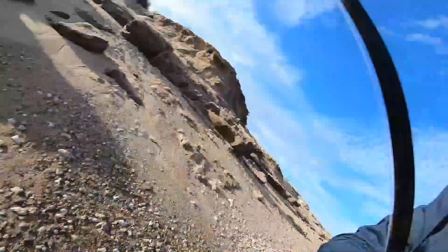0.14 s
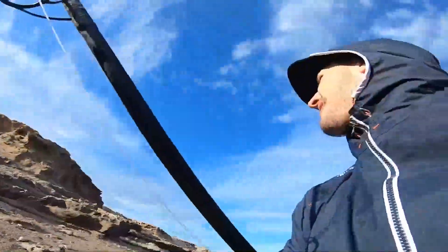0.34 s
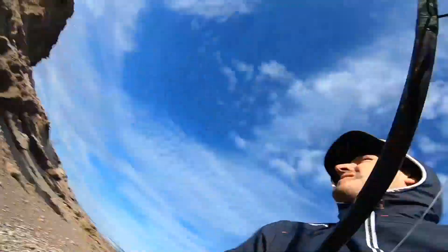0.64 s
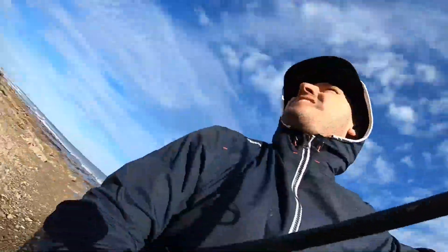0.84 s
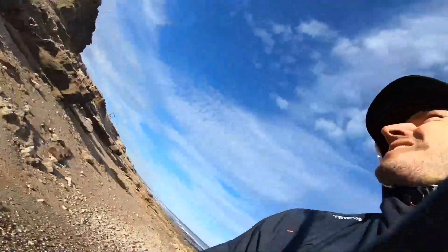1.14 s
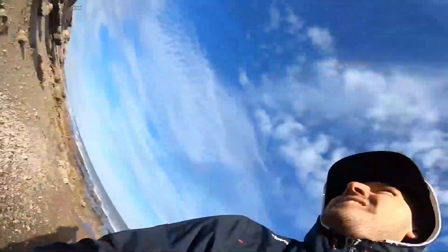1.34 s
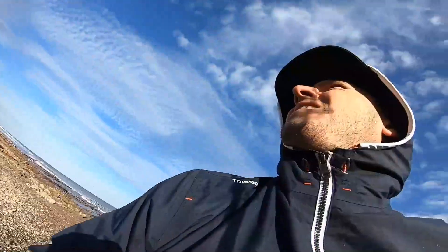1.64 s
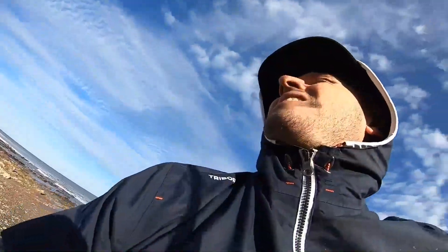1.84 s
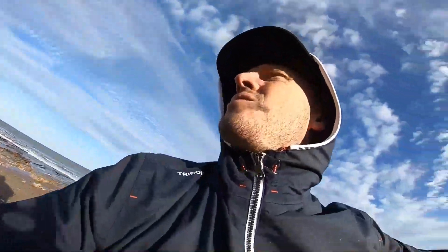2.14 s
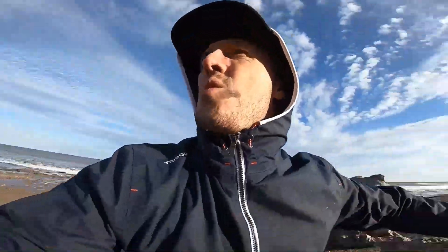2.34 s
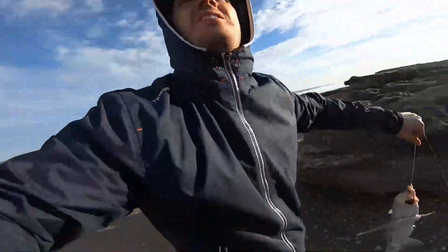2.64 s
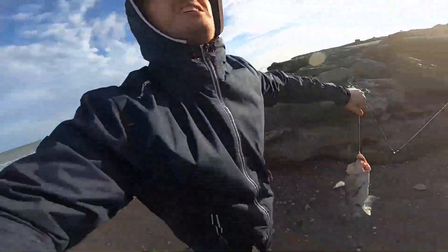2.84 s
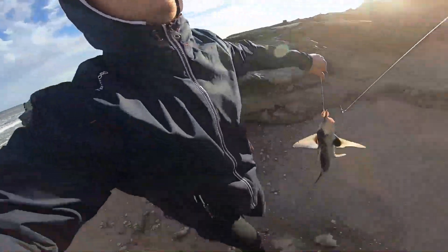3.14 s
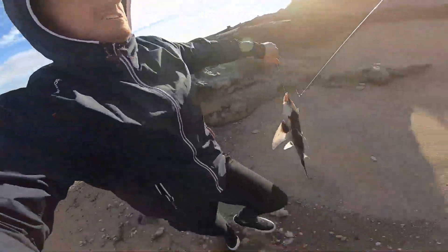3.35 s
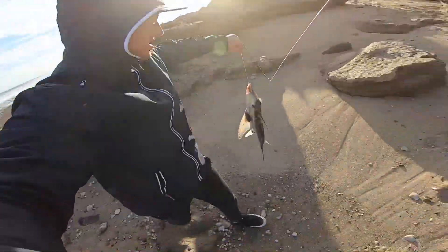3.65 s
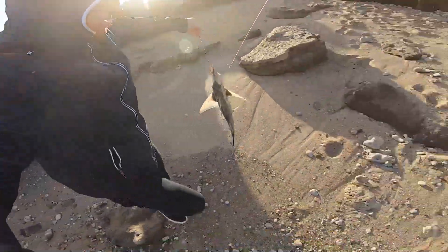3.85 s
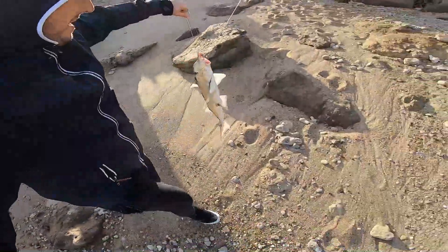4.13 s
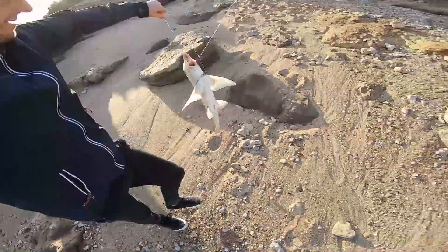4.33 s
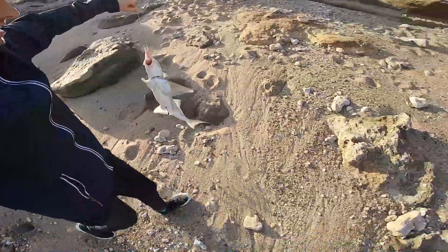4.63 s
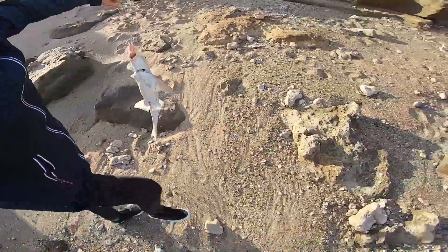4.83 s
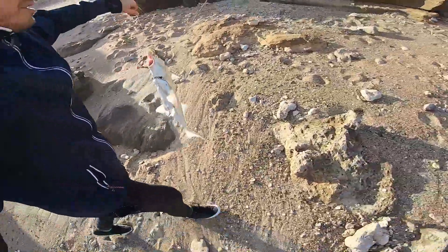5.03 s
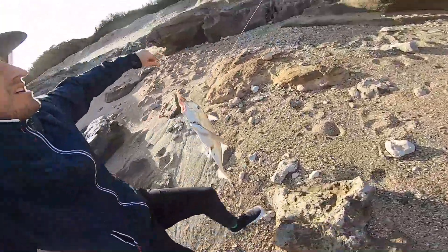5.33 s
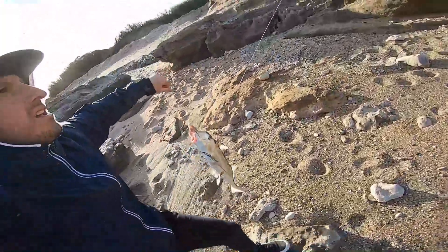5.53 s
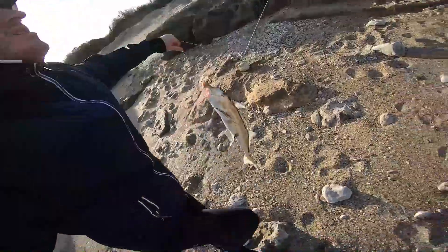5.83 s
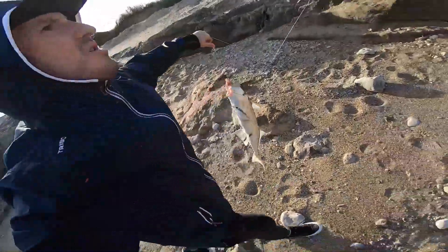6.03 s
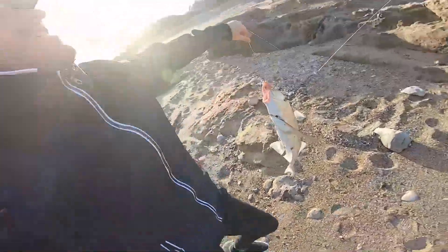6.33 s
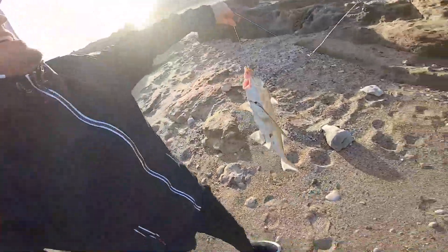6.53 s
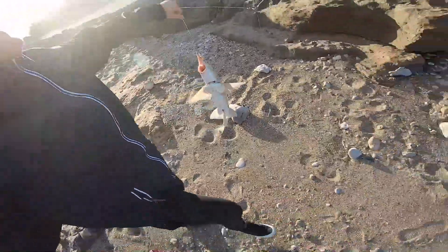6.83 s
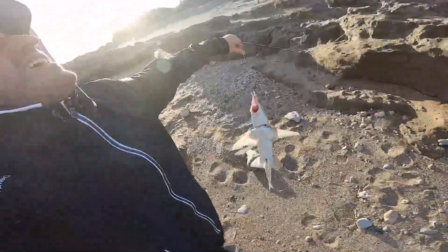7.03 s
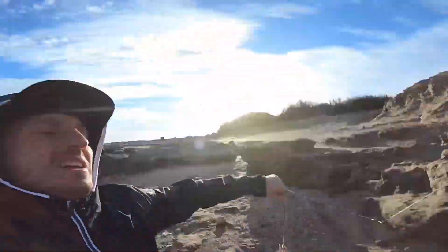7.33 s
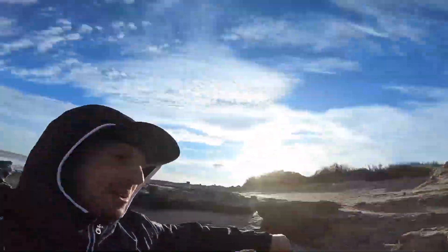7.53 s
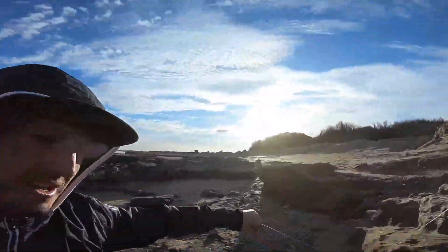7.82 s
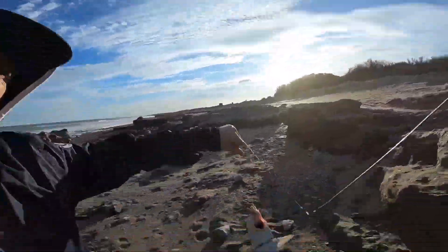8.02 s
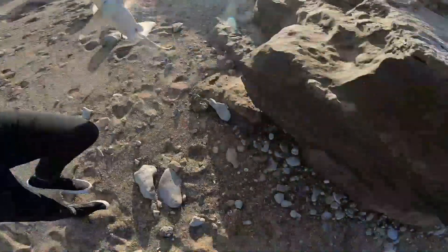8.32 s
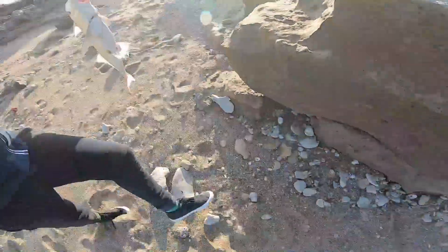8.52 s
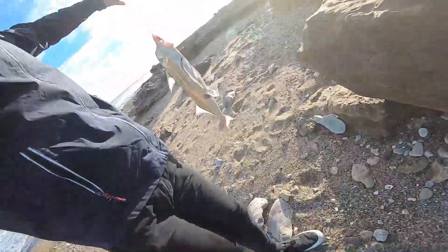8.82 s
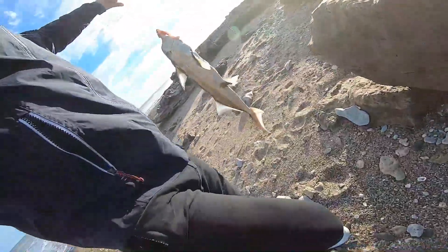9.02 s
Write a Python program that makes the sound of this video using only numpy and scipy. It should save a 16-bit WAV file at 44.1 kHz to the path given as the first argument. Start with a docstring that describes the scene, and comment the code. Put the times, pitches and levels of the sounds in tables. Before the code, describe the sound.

On a windy stony beach, a camera on a hand-held pole picks up mostly its own handling. Quiet wind, thin surf hiss and gritty crunches come first, then a sharp hard knock. Grip rubs and low thumps grow into dense rattling clusters, briefly easing before another flurry and a quiet end. The microphone is inside the housing, so knocks are close and boxy, with dull treble.

```python
"""A small camera on a hand-held pole is carried by a walker along a stony beach.
The grip slips and rubs in uneven pushes, and joints knock with noise bursts, rings and damped thuds.
Low noise makes the wind on the microphone port; bright noise and tiny clicks make surf and gravel.
Filtered noise makes short rings, ticks and scrapes and a very faint, steady band near 8.7 kHz.
A jacket sleeve brushes in clumps of fine grains."""
import sys
import numpy as np
from scipy import signal
from scipy.fft import rfft, irfft
from scipy.io import wavfile

SR = 44100
rng = np.random.default_rng(int(sys.argv[2]) if len(sys.argv) > 2 else 0)


def bounce(signal):
    """Save signal as a 16-bit WAV file at the path given by the first command-line argument."""
    frames = np.transpose(np.atleast_2d(signal))
    limited = np.clip(frames, -1, 1)
    pcm = np.round(limited * 32767).astype(np.int16)
    wavfile.write(sys.argv[1], SR, pcm)


N = 404397

# Resonances of the camera housing: f/Hz, width/Hz, relative level/dB
HOUSING_MODES = [(820, 90, -1), (927, 274, 3.5), (1181, 133, 1), (1566, 150, -4.5), (1898, 130, -7),
                 (2425, 100, -15), (3184, 250, -18), (4520, 240, -26.5), (5130, 110, -29.5)]
# Resonances of the microphone port, heard in surf and gravel: f/Hz, width/Hz, relative level/dB
PORT_MODES = [(4000, 660, -5.5), (4660, 210, -5), (5050, 350, -16), (6340, 600, -4.5), (3200, 370, -23),
              (2390, 83, -12)]


def from_db(db):
    """Turn decibels into a gain."""
    return 10 ** (np.asarray(db) / 20)


def rms_one(x):
    """Scale a sound to an average strength (rms) of 1."""
    return x / np.sqrt(np.mean(x ** 2) + 1e-20)


def in_time(rows):
    """Draw straight lines between a table's points, giving each column a value at every sample."""
    s, *columns = np.transpose(rows)
    t = np.arange(N) / SR
    return [np.interp(t, s, column) for column in columns]


def drift(rate_hz):
    """Slow random wandering of spread 1: noise smoothed twice by a one-pole low-pass."""
    r = np.exp(-2 * np.pi * rate_hz / SR)
    noise = rng.standard_normal(N + SR)
    smooth = signal.lfilter([1], [1, -2 * r, r * r], noise)
    return rms_one(smooth[SR:])  # the first second lets the filter settle


def colour(x, spectrum, size=8192):
    """Filter a sound to a given spectrum, responding as early as possible (minimum phase)."""
    hz = np.maximum(np.arange(size // 2 + 1) * SR / size, 1)
    points = np.array(spectrum)
    level_db = np.interp(np.log(hz), np.log(points[:, 0]), points[:, 1], left=-90, right=-90)
    # folding the cepstrum onto positive times makes the filter minimum phase
    cepstrum = irfft(np.log(from_db(level_db)))
    cepstrum[1:size // 2] *= 2
    cepstrum[size // 2 + 1:] = 0
    response = irfft(np.exp(rfft(cepstrum)))
    return signal.fftconvolve(x, response)[:N]


def grains(per_s, spread_db):
    """Random clicks of uneven size and either sign, like many tiny contacts."""
    sizes = from_db(spread_db * np.minimum(rng.exponential(1, N), 4))
    signs = rng.choice([-1, 1], N)
    return rms_one(sizes * signs * (rng.random(N) < per_s / SR))


def resonate(x, hz, width_hz):
    """Ring at one pitch: the same resonance twice in a row, for steep sides."""
    r = np.exp(-np.pi * max(width_hz, 5) / SR)
    section = [1, 0, -1, 1, -2 * r * np.cos(2 * np.pi * hz / SR), r * r]
    return signal.sosfilt([section, section], x)


def through_modes(x, modes, wander_db):
    """Drive each resonance more or less as the point of contact wanders."""
    total = np.zeros(N)
    for hz, width_hz, db in modes:
        drive = from_db(wander_db * drift(20)) * x
        total += from_db(db) * rms_one(resonate(drive, hz, width_hz))
    return total


def wind(buffet_db):
    """Lumpy low turbulence on the port: low-coloured noise of wandering strength."""
    # Wind spectrum: f/Hz, relative level/dB
    buffet_spectrum = [(12, -37), (25, -6.5), (40, 1), (70, -2.5), (110, -4), (300, -66)]
    lumps = from_db(2.9 * drift(17.0))
    return from_db(buffet_db) * rms_one(colour(lumps * rng.standard_normal(N), buffet_spectrum))


def grip(rumble_db, rub_db):
    """Stick-slip of the hand: one uneven pressure drives the pole's rumble and the housing's rub."""
    # Pole rumble spectrum: f/Hz, relative level/dB
    rumble_spectrum = [(35, -57), (60, 0), (167, 5.5), (229, -1.5), (257, -3.5), (312, -12.5), (371, -19),
                       (428, -12.5), (600, -61.5), (780, -60.5), (1320, -120)]
    # Grip rub spectrum: f/Hz, relative level/dB
    rub_spectrum = [(180, -3.5), (300, 12), (371, -5), (427, 0.5), (760, 5), (1220, -11), (2840, -36.5),
                    (5000, -30.5), (6500, -72), (11000, -120)]
    # Hollower note, stronger when the grip is loose: t/s, level against the coloured rumble/dB
    hollow_curve = [(0, -8.5), (1.3, -5.5), (1.6, -3.5), (2.7, -24), (3.4, -9), (4.1, -38), (4.8, -20.5),
                    (6.2, -17.5), (9.17, -35)]
    pressure = drift(11.9)

    pushes = from_db(3.52 * pressure) * grains(900, spread_db=1.5)
    hollow = from_db(in_time(hollow_curve)[0]) * rms_one(resonate(pushes, hz=360, width_hz=400))
    rumble = rms_one(colour(pushes, rumble_spectrum)) + hollow

    slip_swing_db = 2.2  # how far hand pressure sways the rub
    sway = from_db(slip_swing_db * pressure + 1.4 * drift(85))
    rubs = sway * grains(800, spread_db=2.5)
    housing = through_modes(rubs, HOUSING_MODES, wander_db=2.5)
    rub = rms_one(rms_one(colour(rubs, rub_spectrum)) + from_db(-8.5) * housing)
    return from_db(rumble_db) * rumble + from_db(rub_db) * rub, pressure


def shore(hiss_db, pressure):
    """Surf: smooth hiss with sparse crackles, partly shaken along with the grip."""
    # Surf spectrum: f/Hz, relative level/dB
    hiss_spectrum = [(1060, -19.5), (1800, 10.5), (1950, 7), (2990, 2.5), (3420, 2), (6210, 3),
                     (8220, -12.5), (10500, -13), (13600, -76), (22000, -120)]
    flicker = from_db(2.0 * pressure + 1.8 * drift(23))
    crackles = 0.3 * grains(150, spread_db=3.0)
    source = flicker * (rng.standard_normal(N) + crackles)
    port = through_modes(source, PORT_MODES, wander_db=2.5)
    return from_db(hiss_db) * rms_one(rms_one(colour(source, hiss_spectrum)) + 0.21 * port)


def knocks():
    """A joint snaps and rattles after a brief swell, with housing rings, a tick and a damped thud."""
    # Knocks in the pole, levels before mixing:
    # t/s, knock level/dB, thud level/dB, thud f/Hz, bright tick level/dB
    knock_table = [(.134, -31, -27.5, 292, -65), (0.255, -29, -47, 250, -58), (0.272, -24, -42, 247, -52),
                   (0.43, -34, -26.5, 158, -70), (0.851, -47, -23, 151, -68), (.951, -32, -38, 120, -47),
                   (0.996, -29, -26, 121, -55), (1.018, -12.5, -10.5, 88, -40), (1.072, -52, -37, 93, -44),
                   (1.307, -26, -10.5, 87, -72), (1.525, -5, -5, 122, -17.5), (1.539, -21, -24, 163, -45),
                   (1.546, -14.5, -12.5, 158, -40), (1.583, -17.5, -18, 133, -33.5),
                   (1.699, -11.5, -7, 159, -32), (1.811, -21, -20.5, 138, -60),
                   (1.864, -19.5, -19.5, 262, -75), (2.288, -15, -14.5, 239, -75),
                   (2.364, -16.5, -16.5, 244, -27.5), (2.403, -17, -14.5, 256, -38),
                   (2.518, -19, -41, 140, -43), (2.546, -15, -11, 128, -23.5), (3.045, -29, -16, 141, -61),
                   (3.135, -26.5, -13.5, 95, -55), (3.241, -29, -16.5, 157, -59),
                   (3.386, -28, -37, 177, -46), (3.435, -13, -36, 202, -46), (3.494, -22, -20, 200, -61),
                   (3.509, -21, -31, 200, -54), (3.78, -34, -46, 149, -50), (3.896, -29, -47, 270, -44),
                   (4.111, -22, -20, 117, -52), (4.181, -25, -31, 151, -45), (4.232, -26, -14, 155, -57),
                   (4.404, -28, -30, 295, -47), (4.419, -16, -36, 98, -73), (4.606, -17.5, -20, 88, -59),
                   (4.645, -24, -9.5, 97, -66), (5.002, -22, -22, 201, -49.5),
                   (5.071, -16, -25, 160, -41.5), (5.116, -13, -33, 151, -52), (5.149, -15, -34, 149, -41),
                   (5.199, -14.5, -8, 143, -35.5), (5.303, -16, -14, 155, -41), (5.355, -10, -10, 144, -38),
                   (5.506, -16, -17, 184, -59), (5.57, -28, -33, 150, -56), (5.593, -44, -44, 149, -34),
                   (5.627, -24, -41, 150, -46), (5.707, -10, -25, 171, -26.5), (5.769, -12, -20, 142, -61),
                   (5.831, -22, -21.5, 155, -58), (6.052, -21, -22.5, 201, -67),
                   (6.067, -23, -25, 200, -48), (6.115, -43, -45, 180, -46), (6.176, -16, -17.5, 161, -50),
                   (6.259, -15, -44, 204, -47), (6.343, -15.5, -21, 175, -45),
                   (6.419, -12.5, -14, 138.5, -39), (6.516, -7, -7.5, 115, -29),
                   (6.556, -13.5, -16, 171, -39.5), (6.585, -19, -9, 147, -44), (6.615, -12, -13, 178, -52),
                   (6.681, -23, -31, 141, -68), (6.703, -13, -10, 124, -53), (6.716, -9.5, -6, 116.3, -54),
                   (6.754, -7, -9.5, 181, -48), (6.776, -26, -17, 149, -60), (6.79, -22, -18, 130, -48),
                   (6.803, -5.5, -5, 105.4, -41.5), (6.838, -6, -11, 129, -41),
                   (6.988, -11.5, -6, 173, -40), (7.007, -10.5, -8, 155, -47),
                   (7.255, -16, -10, 145, -39.5), (7.304, -5.5, -23, 135, -58),
                   (7.368, -9, -10, 103, -32.5), (7.385, -15.5, -18, 143, -56), (7.394, -10, -17, 149, -57),
                   (7.401, -11, -16, 146, -38.5), (7.412, -15, -22, 150, -61), (7.546, -17, -21, 99, -75),
                   (7.565, -9, -12, 228, -40), (7.628, -9, -24, 127, -54), (7.673, -16, -14.5, 104, -49.5),
                   (8.2445, -24, -11, 162, -36.5), (8.266, -22, -15, 90, -39), (8.298, -13, -13, 177, -69),
                   (8.309, -12, -13.5, 170, -67), (8.332, -6, -14, 169, -44.5),
                   (8.379, -14.5, -11, 167, -54), (8.406, -15, -15, 185, -49.5),
                   (8.458, -10, -16.5, 183, -55), (8.491, -12.5, -21, 148, -58),
                   (8.529, -12.5, -29, 133, -58), (8.537, -18, -16, 128, -52),
                   (8.547, -12.5, -6.5, 132, -47), (8.578, -9, -14.5, 137, -50),
                   (8.794, -23, -22, 109, -62), (8.817, -20.5, -19.5, 166, -50),
                   (9.026, -25.5, -29, 88.6, -46), (9.041, -27, -28, 181, -40.5),
                   (9.08, -21.5, -19, 138, -61)]
    # Rattle spectrum: f/Hz, relative level/dB
    rattle_spectrum = [(200, -20.5), (300, 10), (600, 1.5), (1200, 0), (2500, -19), (3600, -39),
                       (6000, -46)]
    # Tick spectrum: f/Hz, relative level/dB
    tick_spectrum = [(1000, -2), (1900, 15), (3200, 10.5), (5000, 9), (7000, -5.5), (9000, -13),
                     (11000, -23.5), (16000, -36.5)]
    swell_s, swell_db = 0.004, -9.0
    rattle_s, tick_s = 0.0048, 0.00086  # times to fall to 37 %
    rise_s, thud_t60_s = 0.0017, 0.086  # thud rise time; time to fall by 60 dB
    snap_from_hz, snap_to_hz, snap_fall_s, snap_s = 1400, 340, 0.002, 0.0045
    hardness, usual_tick_db = .22, -28  # a weaker tick softens the rattle and ring by this share
    uneven_db, detune = 5, 0.05  # spread of ring strengths; spread of pitches as the grip changes
    width_scale = 0.96  # the housing rings a little longer here

    t = np.arange(round(.2 * SR)) / SR - .02  # starts 20 ms before the blow
    after = np.maximum(t, 0)
    struck = t >= 0
    swell = (t < 0) * from_db(swell_db) * np.exp(np.minimum(t, 0) / swell_s)
    rattle_fall = np.exp(-after / rattle_s)
    tick_fall = np.exp(-after / tick_s)
    burst_shape = swell + struck * (rattle_fall + 0.5 * tick_fall)
    tick_shape = 0.51 * swell + struck * (tick_fall + 0.17 * rattle_fall)

    # a blow travels along the pole, high notes first
    glide = (snap_from_hz - snap_to_hz) * snap_fall_s * (1 - np.exp(-after / snap_fall_s))
    turns = snap_to_hz * after + glide
    snap = np.sin(2 * np.pi * turns) * np.exp(-after / snap_s)

    rattles, rings, ticks, thuds = np.zeros((4, N + len(t)))
    for s, knock_db, thud_db, thud_hz, tick_db in knock_table:
        first = round((s + t[0]) * SR)
        span = slice(first, first + len(t))
        noise = rng.standard_normal(len(t))
        burst = noise * burst_shape
        ring = np.zeros(len(t))
        for hz, width_hz, db in HOUSING_MODES:
            share = from_db(uneven_db * rng.standard_normal())
            tuning = 1 + detune * rng.standard_normal()
            ring += share * from_db(db) * rms_one(resonate(burst, hz * tuning, width_scale * width_hz))

        hard_db = knock_db + hardness * (tick_db - knock_db - usual_tick_db)
        rattles[span] += from_db(hard_db) * burst
        rings[span] += from_db(hard_db) * ring / np.max(np.abs(ring))
        ticks[span] += from_db(tick_db) * noise * tick_shape

        # the thud starts sharp and settles to its pitch
        swing = np.sin(2 * np.pi * thud_hz * (after - 0.0012 * np.exp(-after / 0.0036)))
        thud_gain = from_db(thud_db - 60 * after / thud_t60_s)
        thuds[span] += thud_gain * swing * (1 - np.exp(-after / rise_s))
        snap_db = -3.5 + 0.3 * thud_db + 1.2 * knock_db  # follows mostly the knock
        thuds[span] += from_db(snap_db) * snap

    # plain noise through each filter gives the gain to divide out
    unit = rng.standard_normal(N)
    rattle = colour(rattles, rattle_spectrum) / np.std(colour(unit, rattle_spectrum))
    tick = colour(ticks, tick_spectrum) / np.std(colour(unit, tick_spectrum))
    joint = from_db(-8.5) * rattle + from_db(-13.5) * rings[:N]
    return joint + from_db(8.5) * tick + from_db(4.0) * thuds[:N]


def slips():
    """Each slip swells, holds and fades by one rule; overlapping slips add in power."""
    # Slips and jolts of the grip, with rumble, rub and a bright crunch:
    # start t/s, hold/s, pole rumble level/dB, grip rub level/dB, crunch level/dB
    slip_table = [(0.282, .02, -36.5, -47, -48), (0.522, 0.049, -39.5, -63, -47),
                  (0.789, 0.046, -36, -39, -44), (0.97, 0.018, -33.5, -48, -49),
                  (1.126, 0.063, -36.5, -49, -54), (1.344, 0.2, -38, -47.5, -53.5),
                  (1.76, 0.0071, -29.5, -35.5, -52.5), (2.009, 0.01, -40, -32, -57),
                  (2.358, 0.065, -29.5, -31, -52.5), (2.456, 0.11, -24.5, -35.5, -51.5),
                  (2.616, 0.098, -23, -48.5, -60), (2.771, 0.11, -18.5, -62, -69),
                  (3.065, 0.023, -51, -64, -56.5), (3.368, .03, -36, -38.5, -55.5),
                  (3.413, 0.14, -17, -30, -69), (3.615, 0.013, -42, -35, -46),
                  (3.728, 0.013, -20.5, -37.5, -76), (3.909, 0.0091, -25.5, -30.5, -57),
                  (4.118, 0.082, -29, -30.5, -59), (4.417, 0.015, -20.5, -26, -59),
                  (4.02, 0.07, -37, -38.5, -60.5), (4.24, 0.12, -39, -42, -65),
                  (4.527, 0.067, -23.5, -35, -51), (4.611, 0.12, -22, -34.5, -65),
                  (4.75, 0.026, -25, -54, -68), (4.798, 0.034, -19, -60, -74),
                  (5.05, 0.29, -28.5, -30, -63), (5.193, 0.18, -28, -25, -57.5),
                  (5.317, 0.25, -20.5, -28.5, -60.5), (5.5, 0.15, -23, -26.5, -55),
                  (5.659, 0.061, -17.5, -29, -49.5), (6.127, 0.18, -25, -36.5, -62),
                  (5.848, 0.018, -30, -40, -67), (6.248, 0.072, -37, -31.5, -60),
                  (6.442, 0.075, -30, -41, -51.5), (6.554, 0.054, -10.5, -35.5, -48.5),
                  (6.712, 0.019, -20, -30.5, -47), (6.752, 0.12, -17.5, -39, -61.5),
                  (7.013, 0.017, -21, -37, -53.5), (7.188, 0.082, -36.5, -37.5, -54),
                  (7.296, 0.025, -16.5, -31, -62), (7.379, 0.036, -19.5, -33, -64),
                  (7.581, 0.073, -15, -36.5, -59), (8.297, 0.032, -15.5, -23, -51),
                  (8.389, 0.034, -19, -59, -57), (8.444, 0.014, -17.5, -31, -60.5),
                  (8.51, 0.039, -26, -37.5, -66.5), (8.647, 0.025, -41, -41, -59),
                  (8.814, 0.014, -35, -48, -60), (9.032, 0.043, -32.5, -39.5, -80)]
    onset_db_per_s = 402
    # How fast rumble, rub and crunch die: three rates/(dB per s)
    fade_db_per_s = [177, 229.5, 296]
    t = np.arange(N) / SR
    power = np.full((3, N), 1e-14)
    for start, hold, *levels_db in slip_table:
        first = max(round((start - .3) * SR), 0)
        near = slice(first, round((start + hold + .5) * SR))
        before = np.maximum(start - t[near], 0)
        after = np.maximum(t[near] - start - hold, 0)
        loss_db = onset_db_per_s * before + np.c_[fade_db_per_s] * after
        power[:, near] += from_db(2 * (np.c_[levels_db] - loss_db))  # doubled dB gives power
    return power


def with_slips(rest_db, power):
    """Add the slips' power to the resting level, giving dB."""
    return 10 * np.log10(from_db(2 * rest_db) + power)


def gravel(power, pressure):
    """Stones and sand grinding: dense clumped grains, swayed by the hand's pressure."""
    # Gravel spectrum: f/Hz, relative level/dB
    grit_spectrum = [(900, -15.5), (1600, -0.5), (2600, 5.5), (3500, 1.5), (5000, -5.5), (6500, -20.5),
                     (8300, -4.5), (10500, -30), (14000, -74.5)]
    grind_swing_db, clump_db = 2, 3  # sway from hand pressure; clumping of the grains
    clumps = from_db(grind_swing_db * pressure + clump_db * drift(40))
    source = clumps * grains(1500, spread_db=1.0)
    port = through_modes(source, PORT_MODES, wander_db=2.0)
    return np.sqrt(power) * rms_one(rms_one(colour(source, grit_spectrum)) + port)


def rings_and_scrapes():
    """Short rings, ticks and scrapes: noise through one resonance, narrow or wide, faded in and out."""
    # Short rings, ticks and scrapes, and a very faint, steady narrow band of noise near 8.7 kHz:
    # start t/s, end t/s, f/Hz, width/Hz, level before fades/dB
    ring_table = [(1.503, 1.514, 1120, 140, -26), (1.512, 1.526, 1140, 91, -20),
                  (1.503, 1.534, 1980, 90, -29.5), (1.498, 1.53, 2430, 120, -42),
                  (1.508, 1.53, 5200, 460, -40), (1.535, 1.568, 1870, 270, -34),
                  (1.575, 1.6, 1700, 400, -32), (1.68, 1.75, 1600, 510, -42), (1.68, 1.712, 3000, 470, -44),
                  (1.802, 1.822, 2830, 300, -51), (1.296, 1.31, 7900, 550, -50),
                  (.943, .955, 7900, 600, -47), (1.018, 1.03, 3500, 130, -45),
                  (8.243, 8.275, 1800, 470, -33), (3.49, 3.52, 2350, 160, -44),
                  (1.545, 2.5, 8750, 250, -78), (5.652, 5.7, 167, 35, -8.5), (8.275, 8.31, 980, 260, -25),
                  (8.262, 8.345, 1900, 1440, -37), (2.29, 2.36, 248, 62, -24.5), (2, 2.1, 3300, 140, -76),
                  (2.4, 2.97, 570, 260, -44.5), (4.6, 4.87, 480, 260, -39.5), (2.84, 2.999, 288, 42, -31),
                  (7.697, 7.87, 440, 21, -53), (1.96, 2.195, 248, 52, -36.5),
                  (2.51, 2.538, 1240, 60, -21.5), (2.536, 2.554, 2320, 220, -26.5),
                  (2.534, 2.556, 3060, 410, -42), (2.394, 2.424, 1120, 240, -25.5),
                  (7.292, 7.322, 1120, 350, -20.5), (7.55, 7.665, 820, 240, -28)]
    fade_s, evenness = .015, .6  # longest fade at each end; how steady the sound holds its level, 0-1
    out = np.zeros(N)
    for start, end, hz, width_hz, db in ring_table:
        span = slice(round(start * SR), round(end * SR))
        count = span.stop - span.start
        noise = rng.standard_normal(count + SR // 10)  # extra 0.1 s lets the resonance build up
        ring = resonate(noise, hz, width_hz)[-count:]
        ring = ring / np.abs(signal.hilbert(ring)) ** evenness
        fade = signal.windows.tukey(count, min(2 * fade_s * SR / count, 1))
        out[span] += from_db(db) * rms_one(ring) * fade
    return out


def sleeve():
    """Stiff cloth: fine grains in clumps, only while the arm brushes."""
    # Jacket sleeve brushing, one list per brush: t/s, level before mixing/dB
    brushes = [
        [(5.95, -46.5), (6.036, -40), (6.158, -43), (6.416, -30), (6.638, -46), (6.66, -63)],
        [(6.98, -40), (7.034, -33.5), (7.165, -43), (7.185, -29), (7.245, -23), (7.28, -51)],
        [(8.255, -52), (8.295, -29), (8.34, -31), (8.36, -68)],
    ]
    # Cloth spectrum: f/Hz, relative level/dB
    cloth_spectrum = [(880, -50.5), (1680, 4), (2050, -9), (2420, 6.5), (3200, -5.5), (3800, -22),
                      (4400, -2.5), (5400, -17), (6500, -35.5), (8450, -70.5), (14300, -120)]
    t = np.arange(N) / SR
    level = np.zeros(N)
    for rows in brushes:
        level += from_db(np.interp(t, *np.transpose(rows), left=-120, right=-120))
    clumps = from_db(3 * drift(30))
    cloth = colour(clumps * grains(2500, spread_db=1.0), cloth_spectrum)
    return from_db(-11.5) * level * rms_one(cloth)


def scene():
    """Add up all the sounds as they reach one microphone."""
    # Gusts on the microphone port: t/s, wind level/dB
    gusts = [(0, -37), (.4, -42), (.9, -29.5), (1.3, -37.5), (1.55, -33.5), (2.0, -43.5), (2.4, -33.5),
             (2.9, -20.5), (3.05, -35.5), (4.0, -29), (4.5, -33.5), (4.8, -17), (4.97, -38), (5.3, -26),
             (6.02, -44), (6.3, -29), (6.62, -23), (7.1, -37.5), (7.35, -25), (7.72, -45), (7.82, -41),
             (8.0, -34), (8.2, -31), (8.35, -20.5), (8.6, -23.5), (9.17, -30.5)]
    # The hand at rest on the swinging pole: t/s, pole rumble level/dB, grip rub level/dB
    hold_curve = [(0, -33.5, -45), (.7, -40, -49.5), (1.1, -43, -44.5), (1.65, -43, -65),
                  (2.1, -41.5, -39.5), (2.8, -33.5, -55.5), (3.3, -34.5, -48.5), (3.9, -39, -46),
                  (4.9, -48, -42), (5.8, -43, -38.5), (6.0, -38.5, -46.5), (6.3, -43.5, -45),
                  (6.93, -40, -49), (7.15, -37, -47.5), (7.5, -58, -53), (7.85, -40, -51),
                  (8.2, -39.5, -49.5), (8.7, -32, -46.5), (9.17, -35, -64)]
    # Surf, loud while the microphone faces the sea: t/s, hiss level/dB
    surf_curve = [(0, -50), (.9, -50), (1.45, -54), (1.65, -61.5), (1.95, -68), (2.3, -61), (2.8, -70),
                  (3.3, -60), (4.2, -61), (4.9, -60), (5.8, -61), (6.0, -68.5), (6.4, -59), (6.93, -69),
                  (7.15, -62), (7.75, -70.5), (8.0, -57.5), (8.2, -63.5), (9.17, -64)]
    buffet_db, = in_time(gusts)
    rumble_db, rub_db = in_time(hold_curve)
    surf_db, = in_time(surf_curve)
    jolt, slip, crunch = slips()
    hand, pressure = grip(with_slips(rumble_db, jolt), with_slips(rub_db, slip))
    beach = shore(surf_db, pressure) + gravel(crunch, pressure)
    total = wind(buffet_db) + hand + beach + knocks() + rings_and_scrapes() + sleeve()
    return total[None]  # one channel


def record(dry):
    """Round the peaks softly, then cut the top of the treble."""
    stop_hz = 11172  # from here up, at least 30 dB weaker
    rounded = .8 * np.tanh(dry / .8)
    low_pass = signal.cheby2(6, 30, stop_hz, fs=SR, output="sos")
    return signal.sosfilt(low_pass, rounded)


dry = scene()
out = record(dry)
bounce(out)
```